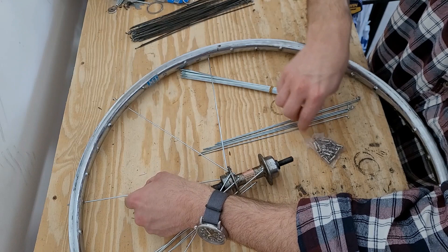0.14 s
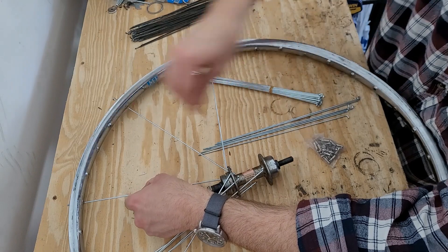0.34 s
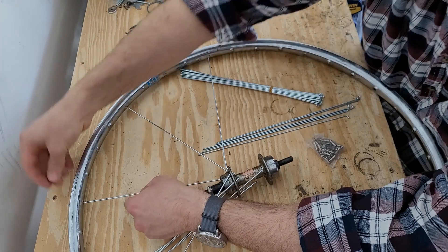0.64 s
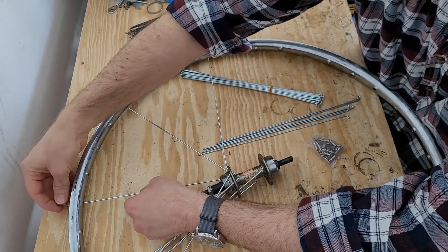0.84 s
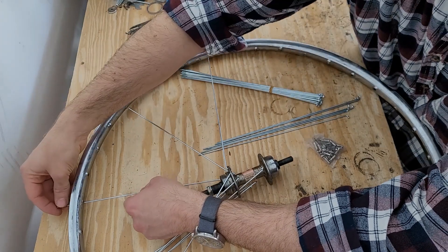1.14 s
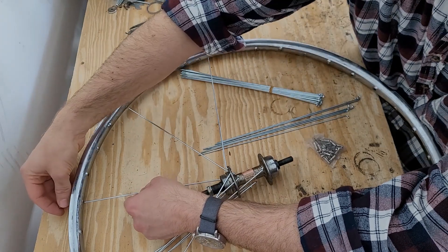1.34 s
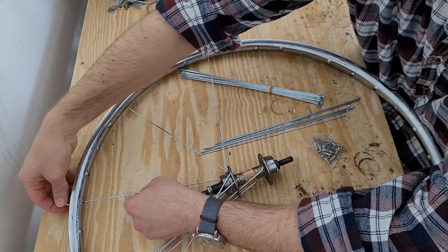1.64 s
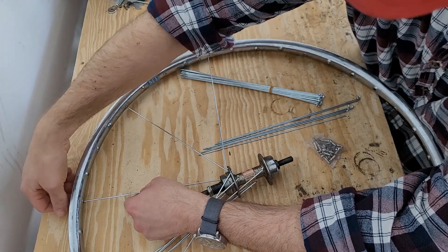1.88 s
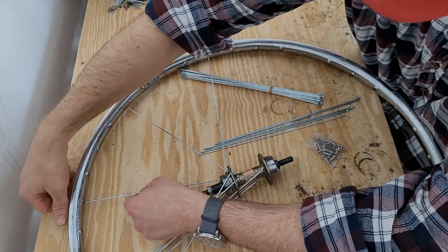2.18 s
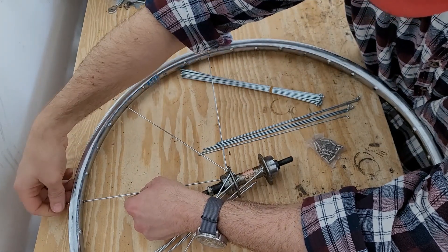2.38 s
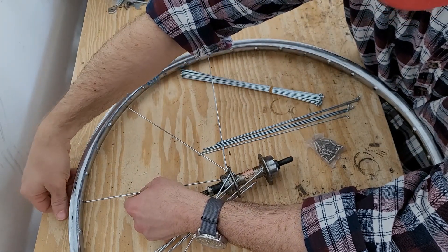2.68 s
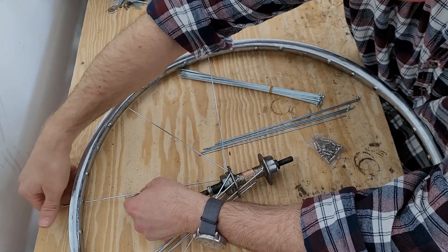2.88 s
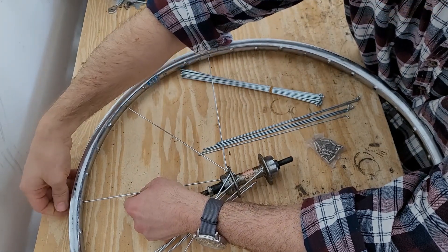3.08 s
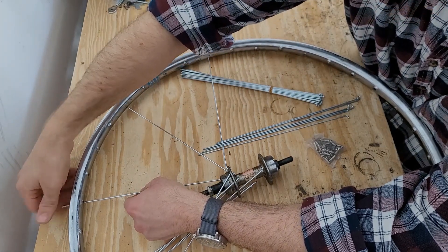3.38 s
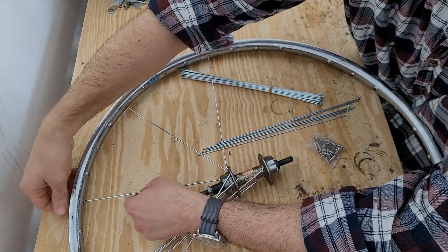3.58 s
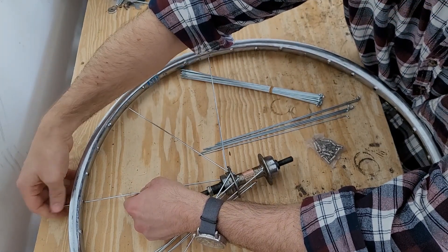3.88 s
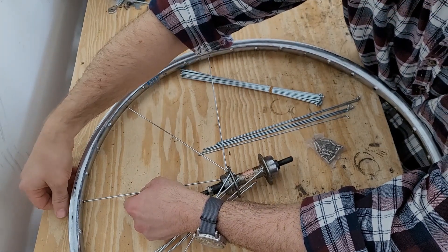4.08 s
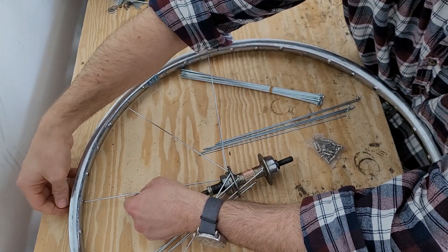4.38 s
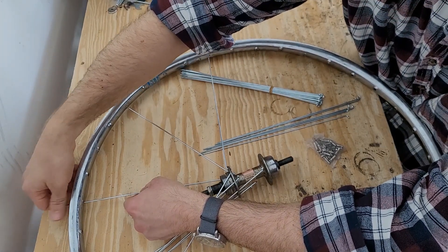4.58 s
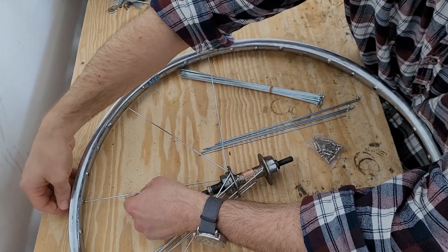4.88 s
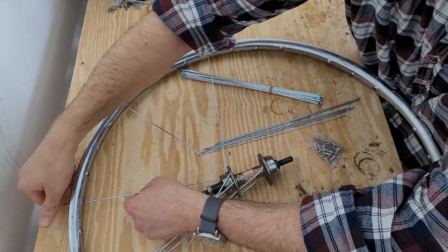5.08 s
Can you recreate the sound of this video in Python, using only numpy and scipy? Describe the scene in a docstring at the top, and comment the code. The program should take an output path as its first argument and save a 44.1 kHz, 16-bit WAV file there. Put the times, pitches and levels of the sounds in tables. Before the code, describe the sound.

A quiet small workshop, heard close in stereo, with low steady room noise, soft bench rumble and faint sleeve brushing. At 0.1 s a thin spoke slides lightly through a metal hole; tiny ticks follow at 0.3 and 0.7, with another faint scrape. Two barely audible arching whistles pass around 0.7-1.3 s. Brighter clicks come at 1.25, a close pair at 1.35, then 1.55, 2.0 and 2.13. A double tick with a slight knock falls at 2.4, further ticks at 2.8, and clinks and scrapes thicken from 3.0. At 3.2 the rim thumps the plywood, deep, hollow and soft-edged, with quick fading rebounds; at 3.67 a stronger thump lands with a knock, a sharp tick and gritty slides. Clear clinks sound at 4.2 and 4.35. Weaker thumps at 4.53 and 4.67 come with dull ticks, then another moderate thump at 5.0 among light scrapes, slightly left.

```python
"""Lacing a bicycle wheel by hand

In a small workshop, loose steel spokes tick and slide in the hub flange and rim holes on a plywood bench.
The spokes are resonance-shaped noise and ringing sines, excited by single contacts or crowds of tiny slips.
The rim bumps on the bench top as decaying low modes, and finger knocks on it are short shaped noise.
Behind it lie steady room noise, a sleeve's brush, bench rumble and two faint arching whistles."""
import sys
import numpy as np
from scipy import signal
from scipy.fft import rfft, irfft
from scipy.io import wavfile
from scipy.ndimage import uniform_filter1d

SR = 44100
rng = np.random.default_rng(int(sys.argv[2]) if len(sys.argv) > 2 else 0)


def waveform_to_disk(signal):
    """Save audio, clipped to [-1, 1], as 16-bit WAV at the path in sys.argv[1]."""
    frames = np.transpose(np.atleast_2d(signal))
    scaled = np.clip(frames, -1, 1) * 32767
    samples = np.round(scaled).astype(np.int16)
    wavfile.write(sys.argv[1], SR, samples)


N = 230675  # samples
TIME = np.arange(N) / SR
RING_TIME = TIME[:SR // 2]
SPOKE_PAN_DB = 1.2  # the spokes lie a little to the left

# All levels and shares below are relative: each source adds its own trim.
# left-right correlation of the stereo noise: pitch_hz [Hz], likeness [-1 to 1]
STEREO_LIKENESS = [(30, 1), (250, 0.78), (500, 0.024), (900, -0.076), (2000, -0.15), (16000, 0.11)]
# spectrum of the room noise: pitch_hz [Hz], level_db [dB]
ROOM_SPECTRUM = [(25, -10.5), (45, -10), (62, 3), (78, -11), (110, -15), (170, -15), (400, -15.5),
                 (750, -10), (1200, -21), (1800, -32.5), (2600, -46.5), (7000, -47.5), (16000, -49)]
# spectrum of the bench rumble: pitch_hz [Hz], level_db [dB]
RUMBLE_SPECTRUM = [(22, -15.5), (36, -21), (48, -3), (57, 6), (64, -2), (73, 2.5), (100, -0.5), (135, -8.5),
                   (250, -12.5), (500, -20)]
# bench rumbling as the arms lean on it: time_s [s], level_db [dB]
LEAN_LEVEL = [(0.0, -65.5), (0.99, -67), (1.32, -63.5), (2.32, -66.5), (2.47, -73), (2.69, -76),
              (2.85, -61), (3.09, -66.5), (3.54, -55.5), (4.22, -53.5), (4.31, -59), (5.23, -55.5)]
# sleeve brushing as the arm moves: time_s [s], level_db [dB]
SLEEVE_LEVEL = [(0.0, -65), (1.38, -59.5), (1.44, -58.5), (2.13, -60), (2.58, -70), (2.85, -66.5),
                (3.36, -63), (4.6, -63), (4.88, -59), (5.23, -63)]
# centre of the sleeve's rustle: time_s [s], pitch_hz [Hz]
SLEEVE_CENTRE = [(0, 770), (.6, 680), (1.0, 480), (1.6, 613), (2.7, 603), (3.3, 403), (4.3, 580),
                 (5.0, 405)]
# faint whistles: start_s [s], top_pitch_hz [Hz], level_db [dB]
WHISTLE_EVENTS = [(.68, 2584, -66), (1.058, 2532, -65)]
# drops of the rim on the bench: start_s [s], level_db [dB], loss_per_rebound_db [dB]
RIM_DROPS = [(2.014, -40, 23), (2.921, -41, 17), (3.222, -12.5, 8), (3.672, -8, 16), (4.532, -26, 19),
             (4.666, -25, 21), (5.015, -20, 14.5)]
# modes of rim and bench top together: pitch_hz [Hz], level_db [dB], t60_s [s]
BENCH_MODES = [(36, -27, .45), (63, -21, .3), (158, 1, .15), (238, -4, .17), (335, -4, .15), (380, -9, .13),
               (445, -17, .14), (488, -13, .15), (618, -24, .16), (686, -22, .16), (756, -18, .15)]
# spectrum of the thud under a bump: pitch_hz [Hz], level_db [dB]
BUMP_SPECTRUM = [(25, -21), (70, -8.5), (160, -3), (350, 0), (700, -21.5), (1400, -32.5), (3000, -47)]
# finger knocks on the rim: start_s [s], level_db [dB]
FINGER_KNOCKS = [(2.41, -49), (2.98, -37), (3.674, -32.5)]
# spectrum of the jolted rim: pitch_hz [Hz], level_db [dB]
KNOCK_SPECTRUM = [(30, -14), (100, 1), (300, 3.5), (600, -6), (900, 1), (1300, -7), (1800, -12.5),
                  (4000, -24), (9000, -37)]
# resonances of spokes, hub and rim, each a crowd of close modes, before damping and scatter:
# pitch_hz [Hz], width_hz [Hz], level_db [dB]
WHEEL_RESONANCES = [(1910, 250, -4), (2460, 56, 1), (2510, 320, -9), (2730, 230, -3.5), (3170, 530, -5.5),
                    (3463, 81, -2), (4110, 600, -1), (4970, 200, -2), (5270, 430, -4.5), (5950, 460, 1),
                    (7320, 53, -9), (6720, 240, 7.5), (7520, 710, 0), (8230, 3000, -2), (8100, 230, -22),
                    (9690, 91, 0), (10000, 35, -15), (10100, 1100, -4), (9760, 440, -33), (11080, 34, 1),
                    (12000, 270, -7), (11760, 190, -1), (12440, 92, 3), (13200, 140, -3.5),
                    (13200, 390, -14), (13950, 100, -21), (13500, 220, 0.5), (15300, 370, -24),
                    (14750, 430, -0.5)]
# the few spoke modes that ring on, before scatter: pitch_hz [Hz], level_db [dB], t60_s [s]
SPOKE_MODES = [(3069, -10, .2), (3455, -1, .2), (4050, -7, .18), (4682, -8, .2), (4800, -3, .2),
               (5053, -7, .2), (6087, 0, .2), (7159, -2, .2), (7310, -8, .2), (8030, -11, .18),
               (12711, -10, .2)]
# faint rubbing of the spoke in hand: time_s [s], level_db [dB]
RUBBING_LEVEL = [(0.0, -59), (0.26, -96), (2.81, -74), (3.01, -72), (3.68, -79), (3.98, -75.5), (4.53, -72),
                 (5.23, -73.5)]
# a spoke slides through its hole: middle_s [s], level_db [dB], treble_db [dB], half_length_s [s]
SPOKE_SLIDES = [(0.115, -52, -7, 0.037), (0.728, -50.5, -16, 0.095), (1.418, -52.5, -21, 0.028),
                (2.337, -56.5, -13, 0.056), (3.019, -47.5, -22, 0.05), (3.223, -47.5, -5, 0.032),
                (3.329, -39, -41, 0.03), (3.484, -42, -19, 0.041), (3.665, -46.5, -11, 0.018),
                (3.7174, -33, -36, 0.031), (3.7798, -35, -22, 0.012), (3.896, -47.5, -21, 0.051),
                (4.119, -52, -12, 0.033), (4.803, -49.5, -14, 0.035), (5.019, -52, -10, 0.099),
                (5.124, -47, -22, 0.035)]
# a spoke strikes metal: start_s [s], level_db [dB], treble_db [dB], clink_db [dB], crack_db [dB]
SPOKE_TICKS = [(0.2842, -60.5, -19, -6, -7), (0.6765, -54, -20, -11, -7), (1.2436, -58, 0, -6, -5),
               (1.346, -45, 8, -4, 8), (1.3618, -47.5, -22, -3, -9), (1.5573, -50.5, -18, -12.5, -2),
               (2.002, -59, -3, -16, 16), (2.1324, -44.5, -4, -23, 9), (2.4119, -41.5, -9, -18, -6),
               (2.4254, -46, -47, -22, 6), (2.7682, -41, -4.5, -6, 0), (2.8185, -47.5, -33, -7, 2),
               (3.1014, -39.5, -9.5, -9, 13), (3.245, -42.5, -14, -13, -15), (3.3018, -43, -1, -5, -17),
               (3.5627, -43.5, -11, -16, 10.5), (3.699, -34, 8, -30, 0), (4.2015, -37, -12, 0, -2),
               (4.3182, -46.5, -11, -1, -15), (4.3585, -36, -18.5, -7, -12), (4.5449, -40, -29.5, -20, -12),
               (4.669, -43, -24, -21, -7)]


def from_db(db):
    """Decibels to gain."""
    return 10 ** (np.asarray(db) / 20)


def rms_one(x):
    """Scale to unit power."""
    return x / np.sqrt(np.mean(x ** 2) + 1e-20)


def at_hz(points, hz):
    """Read a table on a log-frequency axis."""
    known_hz, values = np.transpose(points)
    return np.interp(np.log(np.maximum(hz, 1)), np.log(known_hz), values)


def in_time(rows):
    """Read a control curve at every sample."""
    return np.interp(TIME, *np.transpose(rows))


def noise(colour, size):
    """Stereo noise of a given spectrum, falling away above it, alike in the bass and diffuse in the treble."""
    hz = np.fft.rfftfreq(size, 1 / SR)
    alike = np.clip(at_hz(STEREO_LIKENESS, hz), -1, 1)
    gain = from_db(at_hz(colour, hz)) / np.maximum(hz / colour[-1][0], 1) ** 2
    mid, side = rfft(rng.standard_normal((2, size))) * gain
    left_right = np.sqrt(1 + alike) * mid + np.sqrt(1 - alike) * side * [[1], [-1]]
    return rms_one(irfft(left_right, size))


def dying(t60):
    """Free decay after a blow: 60 dB down after t60 seconds."""
    return np.exp(-np.log(1000) * RING_TIME / t60)


def add(out, sound, s, pan_db):
    """Mix a stereo sound in at a time and a place; positive pan leans left."""
    start = int(s * SR)
    skip, end = max(-start, 0), min(start + sound.shape[1], N)
    out[:, start + skip:end] += sound[:, skip:end - start] * from_db([[pan_db / 2], [-pan_db / 2]])


def room(level_db=-58.5):
    """Low steady noise of the workshop."""
    return from_db(level_db) * noise(ROOM_SPECTRUM, N)


def bench_rumble(level_db=3, waver_db=1.5, waver_s=0.14):
    """The bench rumbles unevenly under the arms: low noise whose level wavers at random."""
    waver = waver_db * rms_one(uniform_filter1d(rng.standard_normal(N), size=int(waver_s * SR)))
    return from_db(in_time(LEAN_LEVEL) + level_db + waver) * noise(RUMBLE_SPECTRUM, N)


def cloth_noise(centre_hz, width_octaves=0.85):
    """Soft cloth noise in narrow bands, strongest around a centre that moves with the arm."""
    out = np.zeros((2, N))
    edges = np.geomspace(200, 1400, 10)
    white = rng.standard_normal((2, 2, N))  # two stereo sources, taken by alternate bands
    for k, (low, high) in enumerate(zip(edges, edges[1:])):
        band_filter = signal.butter(2, [low, high], "band", fs=SR, output="sos")
        band = signal.sosfilt(band_filter, white[k % 2])
        octaves_away = np.log2(np.sqrt(low * high) / centre_hz)
        out += band / (1 + (octaves_away / width_octaves) ** 2) ** 2
    return rms_one(out)


def sleeve(level_db=-66, swing=1.7):
    """Cloth brushes along; swing widens the dB swell and fade about its mean."""
    brush_db = in_time(SLEEVE_LEVEL)
    swell_db = swing * (brush_db - brush_db.mean())
    return from_db(level_db + swell_db) * cloth_noise(in_time(SLEEVE_CENTRE))


def whistles(level_db=-1, length_s=0.25, rise_s=0.16, rise_hz=348, break_at_s=0.192, break_half_s=0.016,
             flutter_hz=32, swell_power=1.6, echo_db=-2, echo_t60=0.31):
    """Thin glides arch to a top pitch, break off briefly just after it, and smear in the room."""
    tone = np.zeros(N)
    flutter = flutter_hz * rms_one(uniform_filter1d(rng.standard_normal(N), size=300))
    for s, top_hz, db in WHISTLE_EVENTS:
        age = np.clip(TIME - s, 0, length_s)
        hz = top_hz - rise_hz * (1 - age / rise_s) ** 2
        swell = np.sqrt(np.abs(np.sin(np.pi * (age / length_s) ** swell_power)))
        unbroken = 1 - np.exp(-((age - break_at_s) / break_half_s) ** 2)
        glide = np.sin(2 * np.pi * np.cumsum(hz + flutter) / SR)
        tone += from_db(db + level_db) * swell * unbroken * glide
    echo = rng.standard_normal((2, len(RING_TIME))) * dying(echo_t60)
    echo = echo / np.linalg.norm(echo[0])
    return tone / 2 + from_db(echo_db) * signal.fftconvolve(tone[None], echo, axes=1)[:, :N]


def bumps(level_db=-4.5, thud_db=-12, thud_t60=0.26, upper_db=1, upper_hz=290, hardness_db_per_db=0.26,
          phase_spread=0.41, rebound_s=0.089, swell_s=0.014, lead_s=0.003995, pan_db=1.5):
    """The rim settles softly on the plywood and rebounds twice; the low modes swell over a few cycles and die."""
    out = np.zeros((2, N))
    swell = 1 - np.exp(-(RING_TIME / swell_s) ** 2)
    touches = [(s + k * rebound_s, peak_db - k * loss_db)
               for s, peak_db, loss_db in RIM_DROPS for k in range(3)]
    for s, peak_db in touches:
        body = from_db(thud_db) * noise(BUMP_SPECTRUM, len(RING_TIME)) * dying(thud_t60)
        # a harder drop has more of the upper modes
        hardness_db = hardness_db_per_db * peak_db + upper_db
        for hz, mode_db, t60 in BENCH_MODES:
            # short waves reach left and right out of step
            ear_phase = phase_spread * hz / upper_hz * rng.standard_normal((2, 1))
            phase = rng.uniform(0, 2 * np.pi) + ear_phase
            gain = from_db(mode_db + hardness_db * (hz > upper_hz))
            body = body + gain * np.sin(2 * np.pi * hz * RING_TIME + phase) * dying(t60)
        add(out, from_db(peak_db + level_db) * body * swell, s - lead_s, pan_db)
    return out


def knocks(level_db=-1, t60=0.098, tail_db=-17, tail_t60=0.74, rise_s=0.00398):
    """A short hollow knock on the hand-damped rim, and its tail in the room."""
    out = np.zeros((2, N))
    attack = 1 - np.exp(-RING_TIME / rise_s)
    envelope = np.hypot(dying(t60), from_db(tail_db) * dying(tail_t60)) * attack
    for s, peak_db in FINGER_KNOCKS:
        knock = noise(KNOCK_SPECTRUM, len(RING_TIME)) * envelope
        add(out, from_db(peak_db + level_db) * knock, s - rise_s / 2, 0)
    return out


def wheel_noise(treble_db, clink_db, scatter_db, corner_hz=8500, clink_hz=6900, clink_width_hz=1000,
                body_db=-15, body_hz=1500):
    """The dense ring of the wheel: a hard contact favours the top, one on the hub flange its clink."""
    hz = np.geomspace(100, SR / 2, 2000)
    centre, width, level_db = np.transpose(WHEEL_RESONANCES)[:, :, None]
    # high resonances are damped more and merge into each other
    width = np.hypot(width, centre ** 2 / 400000)
    # each contact point weights the resonances anew
    level_db = level_db + scatter_db * rng.standard_normal(centre.shape)
    level_db = level_db + treble_db * np.tanh(2 * np.log(centre / corner_hz)) / 2
    level_db = level_db + clink_db * np.exp(-((centre - clink_hz) / clink_width_hz) ** 2)
    peaks = from_db(level_db) / (1 + 2 * ((hz - centre) / width) ** 2)
    body = from_db(body_db) / (1 + (hz / body_hz) ** 2)
    spectrum_db = 10 * np.log10(np.sum(peaks ** 2, axis=0) + body ** 2)
    return noise(np.column_stack([hz, spectrum_db]), len(RING_TIME))


def steel_ring(scatter_db=3.5, scatter_hz=9):
    """The lasting spoke modes; no two spokes are quite alike, and each ear hears its own phase."""
    hz, level_db, t60 = np.transpose(SPOKE_MODES)[:, :, None]
    gain = from_db(level_db + scatter_db * rng.standard_normal(hz.shape))
    hz = hz + scatter_hz * rng.standard_normal(hz.shape)
    phase = rng.uniform(0, 2 * np.pi, (2, len(hz), 1))
    modes = gain * np.sin(2 * np.pi * hz * RING_TIME + phase) * dying(t60)
    return np.sum(modes, axis=1) / np.linalg.norm(gain)


def rubbing(level_db=-6, slips_per_s=70, treble_db=-9, ring_db=-12, wheel_t60=0.2):
    """Faint slips come at random as the fingers turn the spoke, each ringing the wheel."""
    slips = (rng.random(N) < slips_per_s / SR) * rng.standard_normal(N)
    dense = wheel_noise(treble_db, clink_db=6, scatter_db=0) * dying(wheel_t60)
    wheel = dense + from_db(ring_db) * steel_ring()
    rub = rms_one(signal.fftconvolve(wheel, slips[None], axes=1)[:, :N])
    return from_db(in_time(RUBBING_LEVEL) + level_db) * rub


def slides(level_db=-12, ring_db=-4, slips_per_s=300, wheel_t60=0.16, lead_s=0.01, treble_db=8, clink_db=-1,
           skid_below_treble_db=-13, skid_db=-11.5, skid_treble_db=-16, skid_half_s=0.01):
    """The thread catches on the edge of the hole: a swell of tiny uneven slips, each ringing the wheel."""
    out = np.zeros((2, N))
    size = len(RING_TIME)
    middle = RING_TIME[-1] / 2
    firmest_db = np.max(np.array(SPOKE_SLIDES)[:, 1])
    # a dull tick is a glancing one: the spoke skids into place
    skids = [(s, peak_db + skid_db, skid_treble_db, skid_half_s)
             for s, peak_db, bright_db, *_ in SPOKE_TICKS if bright_db < skid_below_treble_db]
    for s, peak_db, bright_db, half_length in list(SPOKE_SLIDES) + skids:
        slips = (rng.random(size) < slips_per_s / SR) * rng.standard_normal(size)
        slips = slips * np.exp(-((RING_TIME - middle) / half_length) ** 2)
        dense = wheel_noise(bright_db + treble_db, clink_db, scatter_db=2)
        # a firmer slide sets the spoke singing more
        pressure = from_db((peak_db - firmest_db) / 2)
        wheel = dense * dying(wheel_t60) + pressure * from_db(ring_db) * steel_ring()
        slips = slips / (np.linalg.norm(slips) + 1e-9)
        scrape = signal.fftconvolve(wheel, slips[None], axes=1)
        add(out, from_db(peak_db + level_db) * scrape, s - middle - lead_s, SPOKE_PAN_DB)
    return out


def ticks(level_db=-11, ring_db=-5, crack_t60=0.012, crack_bright_db=5, dense_t60=0.19, tail_db=-20,
          tail_t60=0.16, treble_db=9, flange_db=13, rise_s=0.0007, thud_db=-9, thud_t60=0.63):
    """A hard contact: a brief bright crack, the wheel's dense ring and room tail, and lasting steel modes."""
    out = np.zeros((2, N))
    attack = 1 - np.exp(-RING_TIME / rise_s)
    envelope = np.hypot(dying(dense_t60), from_db(tail_db) * dying(tail_t60))
    for s, peak_db, bright_db, clink_db, crack_db in SPOKE_TICKS:
        bright_db = bright_db + treble_db
        crack = wheel_noise(bright_db + crack_bright_db, clink_db=0, scatter_db=2) * dying(crack_t60)
        dense = wheel_noise(bright_db, clink_db + flange_db, scatter_db=2.5) * envelope
        # the jolt reaches the rim
        thud = noise(KNOCK_SPECTRUM, len(RING_TIME)) * dying(thud_t60)
        tick = from_db(crack_db) * crack + dense + from_db(ring_db) * steel_ring() + from_db(thud_db) * thud
        add(out, from_db(peak_db + level_db) * tick * attack, s - rise_s, SPOKE_PAN_DB)
    return out


def scene():
    """The workshop behind, then the rim on the bench, then the spokes in front."""
    workshop = room() + bench_rumble() + sleeve() + whistles()
    rim = bumps() + knocks()
    spokes = rubbing() + slides() + ticks()
    return workshop + rim + spokes


def record(dry, cutoff_hz=15950):
    """A steep low-pass removes the extreme treble from both channels."""
    low_pass = signal.firwin(401, cutoff_hz, fs=SR)
    return signal.fftconvolve(dry, low_pass[None], mode="same", axes=1)


dry = scene()
out = record(dry)
waveform_to_disk(out)
```